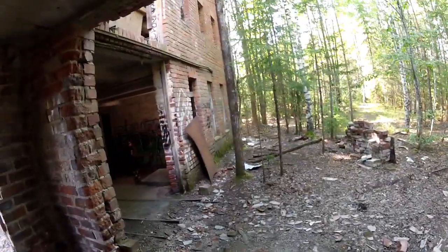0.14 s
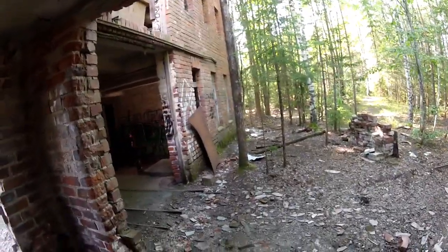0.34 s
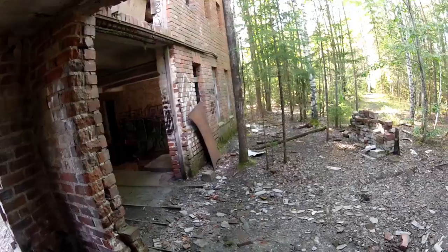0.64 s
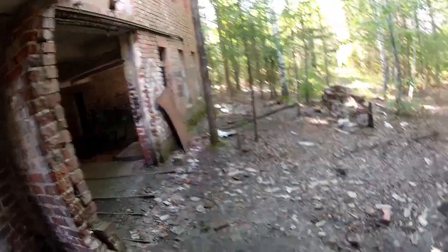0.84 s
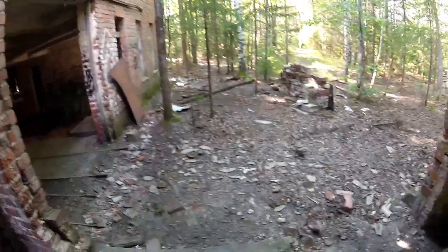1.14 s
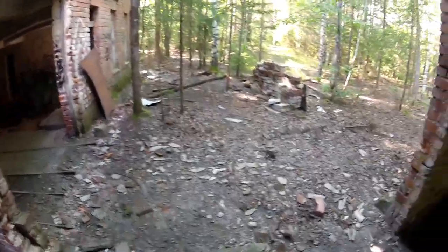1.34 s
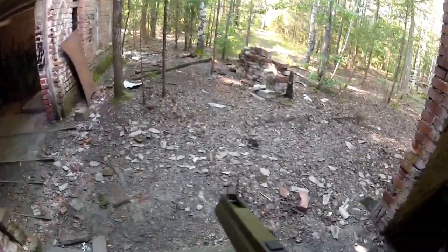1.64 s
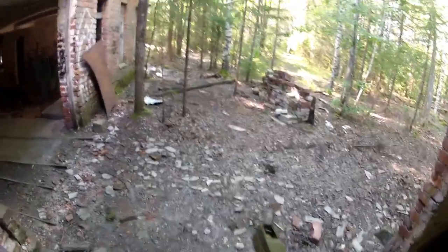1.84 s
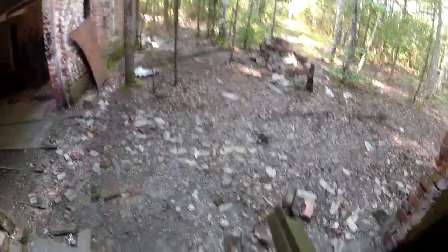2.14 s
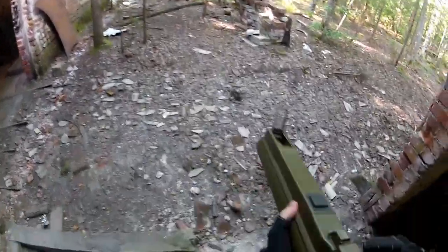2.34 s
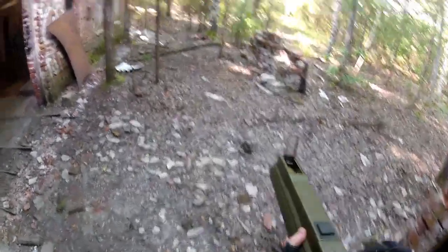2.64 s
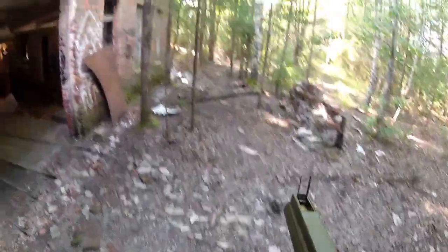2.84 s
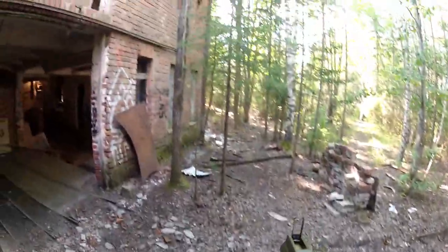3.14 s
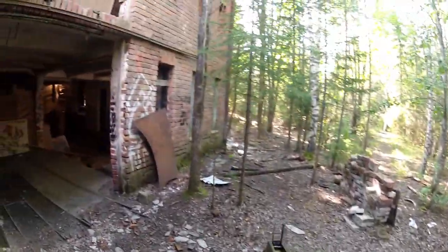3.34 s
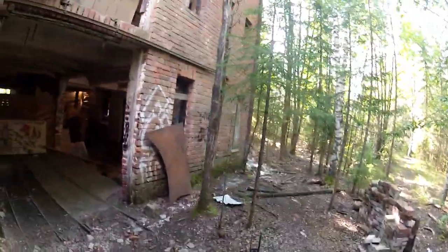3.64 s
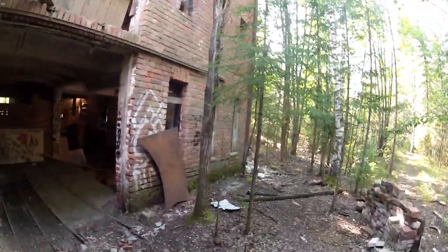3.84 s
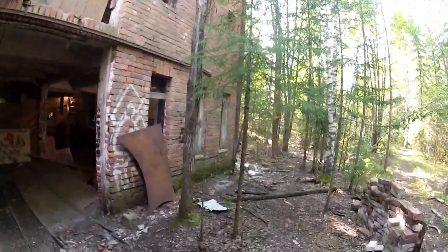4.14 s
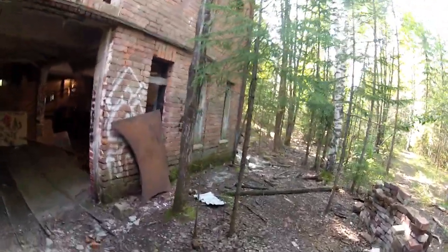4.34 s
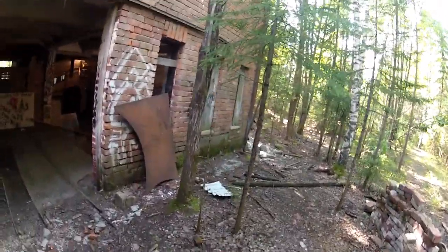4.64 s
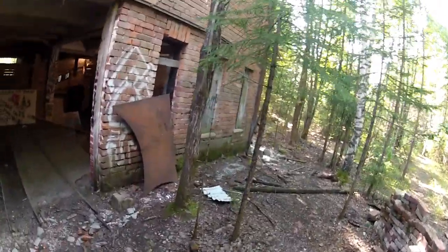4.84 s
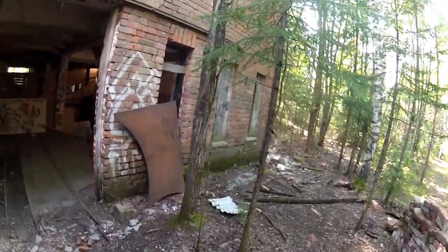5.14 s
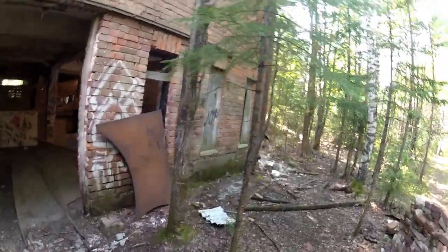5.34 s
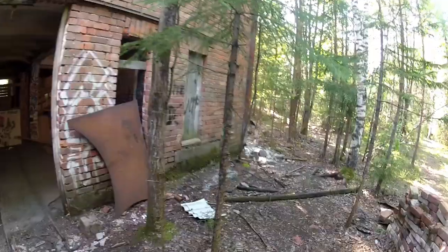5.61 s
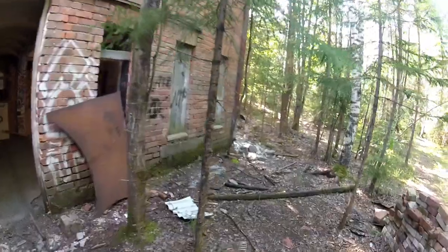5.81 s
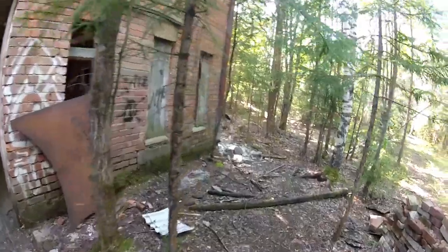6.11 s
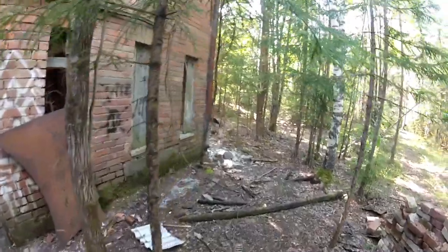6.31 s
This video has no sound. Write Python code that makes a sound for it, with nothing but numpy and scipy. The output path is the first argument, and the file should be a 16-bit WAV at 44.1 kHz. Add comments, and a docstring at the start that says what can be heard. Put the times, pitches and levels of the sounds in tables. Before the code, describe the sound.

Boots scuff dry woodland debris, small twigs tick, a stick breaks loudly, then more snaps, knocks and faint shard clinks follow.

```python
"""Someone steps out of a ruined brick building onto dry woodland, heard from a camera worn on the body.
First twigs snap lightly and rubble knocks; shards clink just before a heavy step cracks wood at about 1.9 s.
Sharp snaps follow at 3.6 s, a second heavy step at 4.3 s with more clinks, and a duller knock at 5.7 s.
Snaps are filtered bursts of fibre clicks; knocks, clinks and thuds are decaying sines. Throughout, random
grains crunch as grit, litter and soil, over mount rumble and a faint steady rush of coloured noise."""
import sys
import numpy as np
from scipy import signal
from scipy.fft import rfft, irfft
from scipy.io import wavfile
from scipy.ndimage import uniform_filter1d

SR = 44100
rng = np.random.default_rng(int(sys.argv[2]) if len(sys.argv) > 2 else 0)


def master(y):
    """Save y as 16-bit WAV."""
    cut = np.clip(np.atleast_2d(y).T, -1, 1)
    pcm = np.round(cut * 32767)  # scale
    wavfile.write(sys.argv[1], SR, pcm.astype(np.int16))


N = 285327


def from_db(db):
    """Decibels to gain."""
    return 10 ** (np.asarray(db) / 20)


def rms_one(x):
    """Scale to rms 1."""
    return x / np.sqrt(np.mean(x ** 2) + 1e-20)


def burst_one(x, size=220):
    """Scale so that the loudest 5 ms have rms 1."""
    power = uniform_filter1d(x ** 2, size, mode="constant")
    return x / np.sqrt(power.max() + 1e-20)


def add(out, s, x):
    """Mix x into out from time s [s] on."""
    at = max(0, round(s * SR))
    out[at:at + len(x)] += x[:N - at]


def dying(t60, size=11025):
    """Exponential decay by 60 dB per t60 [s], a quarter second long by default."""
    return from_db(-60 * np.arange(size) / SR / t60)


def ring(hz, t60):
    """One struck mode: a decaying sine."""
    fade = dying(t60)
    return fade * np.sin(2 * np.pi * hz * np.arange(len(fade)) / SR)


def low_pass(x, order, hz):
    """Butterworth filter that dulls x above hz."""
    return signal.lfilter(*signal.butter(order, hz, fs=SR), x)


def high_pass(x, order, hz):
    """Butterworth filter that thins x below hz."""
    return signal.lfilter(*signal.butter(order, hz, "high", fs=SR), x)


def bell(x, hz, q, db):
    """One resonant peak or hollow."""
    w = 2 * np.pi * min(hz, SR / 2 - 1) / SR
    g = from_db(db / 2)
    a = np.sin(w) / (2 * q)
    zeros = [1 + a * g, -2 * np.cos(w), 1 - a * g]
    poles = [1 + a / g, -2 * np.cos(w), 1 - a / g]
    return signal.lfilter(zeros, poles, x)


def response(spectrum, size=4096):
    """Causal (minimum-phase) impulse response with the given spectrum."""
    hz, db = np.transpose(spectrum)
    grid = np.maximum(np.arange(size // 2 + 1) * SR / size, 1)
    gain = from_db(np.interp(np.log(grid), np.log(hz), db))
    # folding the cepstrum forward in time makes the response causal
    cepstrum = irfft(np.log(gain))
    cepstrum[1:size // 2] *= 2
    cepstrum[size // 2 + 1:] = 0
    return irfft(np.exp(rfft(cepstrum)))


def coloured(x, spectrum):
    """x filtered to a spectrum, rms 1."""
    return rms_one(signal.oaconvolve(x, response(spectrum))[:len(x)])


def drift(rate):
    """Random wander of spread about 1, with rate [1/s] new targets joined by straight lines."""
    knots = rng.standard_normal(N // 40)
    return np.interp(np.arange(N) * rate / SR, np.arange(len(knots)), knots)


def grains(size, per_s, spread_db):
    """Random clicks, many small and a few large, rms 1."""
    sizes = from_db(spread_db * np.minimum(rng.exponential(1, size), 4))
    signs = rng.choice([-1, 1], size)
    struck = rng.random(size) < per_s / SR
    return rms_one(sizes * signs * struck)


# spectrum of breaking wood before the stick's ring: (frequency [Hz], level [dB per Hz])
SNAP_COLOUR = [(150, -24.5), (500, 8), (1200, 4), (2300, 5.5), (4000, -2.5), (6000, -5.5), (9000, -3),
               (15000, -12)]
STRAIN_S, STRAIN_DB = .008, -24.5   # fibres tear faintly for this long before a twig breaks


def crack(db, t60, hz, ring_db, treble_db, first_db=8, build_s=.0016, ring_q=4.1, treble_hz=5500):
    """Wood strains, one fibre gives way, a swelling, dying cascade follows; the stick rings briefly."""
    strain = from_db(STRAIN_DB) * np.linspace(0, 1, round(STRAIN_S * SR))
    cascade = dying(t60) * (1 - dying(build_s))
    fade = np.concatenate([strain, cascade])
    fibres = fade * grains(len(fade), per_s=12000, spread_db=2.0)
    fibres[len(strain)] += from_db(first_db)   # the first fibre to give way
    wood = signal.fftconvolve(fibres, response(SNAP_COLOUR))[:len(fade)]
    stick = bell(wood, hz, ring_q / 2, ring_db)
    dull = low_pass(stick, 1, treble_hz)
    treble = stick - dull
    return from_db(db) * burst_one(dull + from_db(treble_db) * treble)


# twigs breaking: (time [s], level [dB], cascade t60 [s], ring [Hz], ring boost [dB], treble gain [dB])
SNAPS = [(0.402, -47, 0.0062, 2700, 15, 14), (.4513, -40, 0.071, 2560, 11.5, 5.5),
         (0.4814, -49.5, 0.088, 2640, 13, 9), (1.2366, -44.5, 0.095, 2060, 8, -1.5),
         (1.381, -50, .1, 1940, 13, 4.5), (1.761, -51.5, .02, 2810, 8, 7),
         (1.7843, -41, 0.0095, 2620, 16, 4), (1.942, -33, 0.011, 2280, 0, -3.5),
         (1.9475, -17, 0.013, 1880, 15, 13.5), (1.956, -37.5, .05, 2600, 18, -16),
         (2.011, -44.5, 0.13, 3260, 10, 4), (2.0912, -33.5, 0.034, 2660, 8.5, -0.5),
         (2.4378, -54.5, 0.055, 3000, 8, 20), (3.157, -57, .029, 3030, 3, 11),
         (3.269, -55, 0.027, 3000, 0, -8), (3.406, -48, 0.035, 2580, 2, -9),
         (3.4766, -54, .03, 2800, 3, -7), (3.593, -26, 0.02, 1930, 13.5, 3.5),
         (3.5965, -27, 0.016, 3940, 16.5, 7), (3.665, -48, .06, 2400, 3, -12),
         (3.717, -39, 0.033, 2800, 3, -5), (3.745, -39, 0.02, 2200, -7, -7),
         (3.902, -50, .018, 1480, 7, -6), (4.068, -51.5, 0.018, 3000, 10, 4),
         (4.3158, -22, 0.01, 3800, 15.5, 4), (4.3308, -21.5, 0.036, 2330, 8, 2),
         (4.357, -46.5, 0.085, 2300, 6, 3), (4.4116, -54, 0.092, 3360, 12, 14),
         (4.527, -52.5, .015, 3000, -17, -7), (4.586, -52.5, .03, 2400, 6, -4),
         (4.7514, -43.5, 0.055, 2210, 7, 1), (4.7872, -48.5, 0.022, 3560, 15, 14),
         (4.914, -55, 0.02, 3100, 6, 22), (5.448, -53, 0.033, 2900, 0, -7.5),
         (6.155, -53, .015, 3070, 11, 7)]


def snaps():
    """The larger twigs break one by one, each strained just before its time."""
    out = np.zeros(N)
    for s, *twig in SNAPS:
        add(out, s - STRAIN_S, crack(*twig))
    return out


TWIGS_PER_S, TWIG_DB, TWIG_T60_S, TWIG_HZ = 2.1, -65, .02, 2940   # mean count per second, typical level, cascade t60, and a ring pitch that stays unheard without a boost


def small_twigs(spread_db=4.0, spread_octaves=.3):
    """Tiny twigs give way at random moments, each with a strength of its own; their ring gets no boost, so they
    have no pitch of their own."""
    out, count = np.zeros(N), round(TWIGS_PER_S * N / SR)
    times = rng.integers(0, N, count) / SR
    for s, (strength, pitch) in zip(times, rng.standard_normal((count, 2))):
        db = TWIG_DB + spread_db * strength
        hz = TWIG_HZ * 2 ** (spread_octaves * pitch)
        add(out, s, crack(db, TWIG_T60_S, hz, ring_db=0, treble_db=-1))
    return out


# boot or loose rubble knocking, levels before the sole softens them:
# (time [s], level [dB], main ring [Hz], t60 before the length factors [s], loose rattle [dB])
KNOCKS = [(.454, -40.5, 518, 0.05, 2.5), (.484, -45, 387, 0.04, -3), (.65, -52, 435, 0.047, -4),
          (1.2372, -37, 736, .06, 5), (1.3822, -38, 670, 0.059, -1), (1.845, -35, 286, 0.12, -11),
          (1.855, -40.5, 190, 0.15, 2), (1.9421, -29, 188, 0.041, -21.5), (1.9427, -19.5, 506, 0.023, 7),
          (1.95, -13, 846, 0.026, -22), (2.386, -42.5, 550, 0.022, 5), (2.4398, -34, 461, 0.098, -13),
          (2.696, -41, 448, 0.087, -1), (2.698, -44, 181, .2, -3), (2.98, -51.5, 496, 0.032, 6),
          (3.593, -36, 460, 0.05, -3), (3.714, -42.5, 425, .088, 7), (3.7448, -33, 566, 0.042, -14),
          (3.9035, -46, 700, 0.012, -13.5), (4.161, -50.5, 685, .025, -9), (4.3155, -31, 910, .02, 16),
          (4.3271, -30.5, 223, .046, -22.5), (4.332, -13, 773, 0.04, -20),
          (4.335, -25.5, 500, 0.051, -11.5), (4.359, -33.5, 580, 0.03, -4), (4.588, -48, 805, 0.024, -1),
          (4.629, -36, 547, 0.027, 6), (4.664, -48.5, 574, 0.039, 2), (4.741, -36.5, 544, 0.045, -2.5),
          (4.75, -36.5, 313, 0.15, -18), (4.884, -43.5, 617, 0.028, 6), (5.654, -38.5, 458, 0.068, 12)]
# what knocked rubble and boards ring with: (frequency [Hz], t60 [s], level before random spread [dB])
RUBBLE_MODES = [(165, 0.024, -31.5), (306, .05, -21.5), (480, 0.056, -27), (636, 0.046, -13.5),
                (753, 0.022, -12), (1070, 0.1, -29)]


def knocks(mode_spread_db=-2.5, rattle_length=2.1, main_length=.7, low_cut=0.64, sole_hz=1150):
    """A push and a rattle of smaller contacts ring the struck piece and the rubble it lies on."""
    out = np.zeros(N)
    for s, db, hz, t60, rattle_db in KNOCKS:
        body = ring(hz, t60 * main_length)
        for mode_hz, mode_t60, mode_db in RUBBLE_MODES:
            level_db = mode_db + mode_spread_db * rng.standard_normal()
            body = body + from_db(level_db) * ring(mode_hz, mode_t60)
        # a small piece radiates little below its own ring
        body = high_pass(body, 2, low_cut * hz)
        contacts = dying(t60 * rattle_length) * rng.standard_normal(len(body))
        contacts *= from_db(rattle_db) / np.linalg.norm(contacts)
        contacts[0] += 1   # the push
        add(out, s, from_db(db) * burst_one(signal.fftconvolve(contacts, body)))
    # the rubber sole softens every contact; the tiny offset avoids vanishingly small numbers
    return low_pass(out + 1e-18, 2, sole_hz)


# body weight landing: (time [s], level before the soft onset [dB], frequency [Hz], t60 [s])
THUDS = [(1.845, -34, 103, 0.2), (1.946, -29, 62, 0.12), (3.66, -42, 42, 0.17), (3.745, -44.5, 50, 0.17),
         (3.922, -33.5, 112, 0.042), (4.335, -28, 62, 0.19), (4.749, -31.5, 68.4, 0.18)]


def thuds(rise_s=.03):
    """The ground gives under a heavy step and swings a few times."""
    out = np.zeros(N)
    for s, db, hz, t60 in THUDS:
        soft_onset = 1 - dying(rise_s)
        add(out, s, from_db(db) * ring(hz, t60) * soft_onset)
    return out


# hard shards touching: (time [s], level [dB], where it is struck [0 face - 1 edge])
CLINKS = [(1.7614, -44, 0.36), (1.7832, -50, 0), (1.79, -46, 0), (4.606, -60.5, 0.33), (4.629, -51.5, 0.97),
          (4.871, -61, .8), (4.916, -60, 0.89)]
# what a shard rings with, levels before random spread:
# (frequency [Hz], t60 [s], level struck on the face [dB], level struck on the edge [dB])
SHARD_MODES = [(2764, 0.088, -1.5, -1), (2980, 0.076, -2.5, -9), (4960, 0.043, -29, 3),
               (7100, 0.058, -30, -2), (9200, 0.078, -12.5, -4)]


def clinks(mode_spread_db=3.5):
    """Each touch rings the shard's few high modes; where it lands decides which ones stand out."""
    out = np.zeros(N)
    for s, db, edge in CLINKS:
        shard = 0
        for hz, t60, face_db, edge_db in SHARD_MODES:
            struck_db = face_db + edge * (edge_db - face_db)
            level_db = struck_db + mode_spread_db * rng.standard_normal()
            shard = shard + from_db(level_db) * ring(hz, t60)
        add(out, s, from_db(db) * burst_one(shard))
    return out


# a sole rolling, sliding and crushing litter:
# (time [s], rise [s], t60 [s], grit level [dB], scuff level [dB])
SLIDES = [(.245, .04, .2, -60.5, -81), (.45, 0.012, 0.71, -62.5, -55), (.74, 0.049, 0.9, -65, -65.5),
          (1.236, 0.012, 1.6, -66, -55.5), (1.44, 0.035, 0.39, -61.5, -61), (1.5, 0.22, 3.6, -60, -60),
          (1.777, 0.01, 0.15, -48.5, -60), (1.843, 0.008, 1.7, -53.5, -44.5), (1.89, 0.02, 1, -51, -55),
          (2.36, 0.022, 1.2, -60.5, -49.5), (2.62, 0.035, 0.67, -61, -53.5),
          (2.689, 0.0052, 0.81, -69, -47.5), (3.39, 0.053, 2.5, -62.5, -61),
          (3.594, 0.0043, 0.47, -42.5, -47), (3.658, .075, 0.84, -53, -46), (3.97, 0.062, 0.84, -60, -54.5),
          (4.204, 0.027, .1, -55.5, -79), (4.44, .08, 2.2, -62, -64), (4.583, 0.026, 0.23, -57.5, -49.5),
          (4.75, 0.013, 0.32, -49.5, -51.5), (4.868, 0.0082, 0.49, -66.5, -54), (5.2, 0.19, 0.55, -66, -54),
          (5.639, 0.017, 0.63, -51, -43.5), (6.07, 0.16, 2.2, -63.5, -61.5)]
STANDING_GRIT_DB, STANDING_SCUFF_DB = -71.5, -63.5   # the litter under a resting foot


def pressure(steady_db, slide_db):
    """Gain of the resting foot plus each slide, which swells and dies away; powers add."""
    t, power = np.arange(N) / SR, from_db(steady_db) ** 2
    for (s, rise, t60, *_), db in zip(SLIDES, slide_db):
        swell = np.clip((t - s) / rise, 0, 1)
        fall_db = 60 * np.clip((t - s - rise) / t60, 0, 2)
        power = power + (swell * from_db(db - fall_db)) ** 2
    return np.sqrt(power)


def footwork():
    """How hard the soles grind and scuff at every moment, as two gains."""
    *_, grit_db, scuff_db = np.transpose(SLIDES)
    return pressure(STANDING_GRIT_DB, grit_db), pressure(STANDING_SCUFF_DB, scuff_db)


# spectrum of grit and needles: (frequency [Hz], level [dB per Hz])
GRIT_COLOUR = [(300, -14.5), (1000, 7), (2000, 5.5), (3200, 4), (4300, -0.5), (6000, -10.5), (9000, -5.5),
               (15000, -12.5)]
# spectrum of scuffed soil: (frequency [Hz], level [dB per Hz])
SCUFF_COLOUR = [(80, -15), (200, 1), (400, 4.5), (650, 5.5), (850, -3.5), (1100, -26), (3000, -36)]


def tread(grinding, scuffing, clump_db=2.3, crackle_db=-2):
    """Grit grinds in clumps under the sole, dry needles crackle one by one, and the soil scuffs dully."""
    clumps = from_db(clump_db * drift(90))
    needles = grains(N, per_s=200, spread_db=2.5)
    grit = grains(N, per_s=5000, spread_db=1.5) + from_db(crackle_db) * needles
    grit = coloured(grit, GRIT_COLOUR)
    scuff = coloured(grains(N, per_s=2300, spread_db=2.5), SCUFF_COLOUR)
    return clumps * (grit * grinding + scuff * scuffing)


def near_echoes(x, echo_db=-11, above_hz=1500, count=6):
    """Legs, ground and door frame return the treble within milliseconds and ripple its spectrum."""
    treble = high_pass(x, 1, above_hz)
    lags = (rng.uniform(.002, 0.013, count) * SR).astype(int)
    echoes = sum(np.pad(treble, (lag, 0))[:N] for lag in lags)
    return from_db(echo_db) / np.sqrt(count) * echoes


def walls(x, wet_db, t60, build_s, dull_hz):
    """Brickwork and trunks scatter back a weak, dull tail: x convolved with swelling, fading noise."""
    tail = dying(t60, size=22050) * (1 - dying(build_s, size=22050))
    tail = low_pass(tail * rng.standard_normal(len(tail)), 1, min(dull_hz, SR / 3))
    return from_db(wet_db) * signal.oaconvolve(x, tail / np.linalg.norm(tail))[:N]


# spectrum of the shaken camera mount: (frequency [Hz], level [dB per Hz])
JOSTLE_COLOUR = [(15, -12), (35, -10.5), (65, -2.5), (110, 5.5), (160, -3.5), (300, -5.5), (900, -37.5)]
# spectrum of the rush of the wood: (frequency [Hz], level [dB per Hz])
AIR_COLOUR = [(30, 3), (110, -2), (300, -11.5), (650, -11), (1100, -10.5), (3000, -17), (5500, -25),
              (9000, -28.5), (15000, -46)]
AIR_DB = -65
JOSTLE_DB, JOSTLE_FOLLOWS = -61, 0.28   # the mount at rest; share of the footwork's swing in dB


def background(scuffing, settle_s=.07):
    """The steady rush of the wood, and the camera mount, which rumbles with each step and settles after."""
    keep = np.exp(-1 / (settle_s * SR))
    above_rest = scuffing / from_db(STANDING_SCUFF_DB) - 1
    shaken = 1 + signal.lfilter([1 - keep], [1, -keep], above_rest)
    rumble = coloured(rng.standard_normal(N), JOSTLE_COLOUR)
    jostle = from_db(JOSTLE_DB) * shaken ** JOSTLE_FOLLOWS * rumble
    air = from_db(AIR_DB) * coloured(rng.standard_normal(N), AIR_COLOUR)
    return jostle + air


def scene():
    """Steps, their scatter from the walls, the hollow answer of the ruin, and the background."""
    grinding, scuffing = footwork()
    wood, ground = knocks(), tread(grinding, scuffing)
    steps = snaps() + small_twigs() + wood + clinks() + thuds()
    near = near_echoes(steps, echo_db=-18.5) + near_echoes(ground, echo_db=-9)
    scatter = walls(steps, wet_db=-27.0, t60=0.087, build_s=0.033, dull_hz=4500)
    ruin = walls(wood, wet_db=-43, t60=0.78, build_s=.08, dull_hz=1200)
    mix = steps + ground + near + scatter + ruin + background(scuffing)
    return mix[None]   # one channel


# the camera housing's peaks and hollows: (frequency [Hz], Q [1], gain [dB])
HOUSING = [(1380, 0.99, -5.5), (2960, 12, 4), (6060, 6.3, -9), (8850, 4.5, 2), (10380, 7.9, -6.5),
           (11340, 38, 4.5), (12000, 11, -5), (12450, 43, 4.5), (13100, 7.2, -3.5), (14800, 14, 3)]
CUTOFF_HZ = 15300


def record(dry):
    """The housing's resonances colour the sound; a steep low-pass cuts the top."""
    for hz, q, db in HOUSING:
        dry = bell(dry, hz, q, db)
    top_cut = signal.ellip(10, .1, 80, CUTOFF_HZ, fs=SR, output="sos")
    return signal.sosfilt(top_cut, dry)


dry = scene()
out = record(dry)
master(out)
```